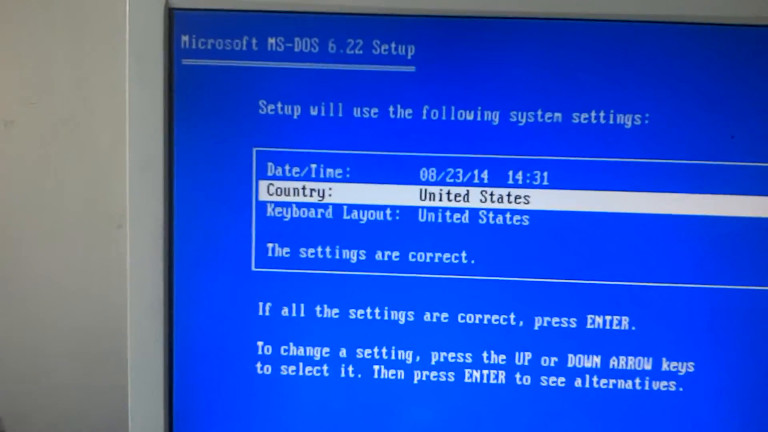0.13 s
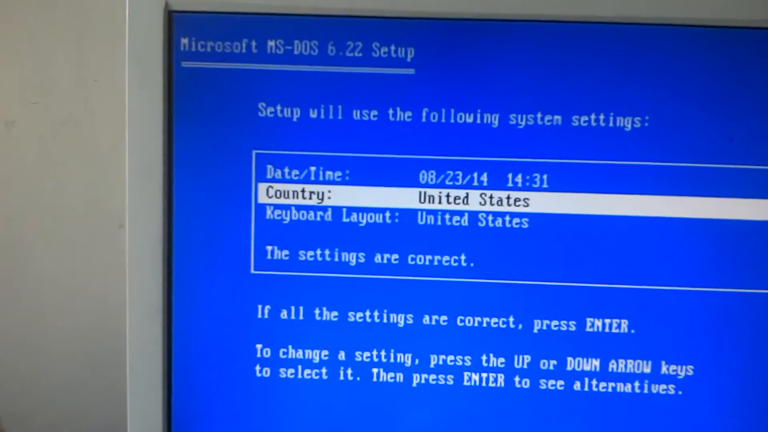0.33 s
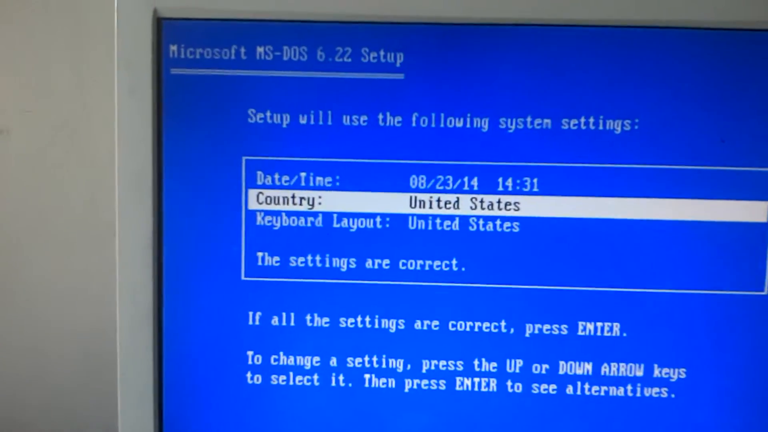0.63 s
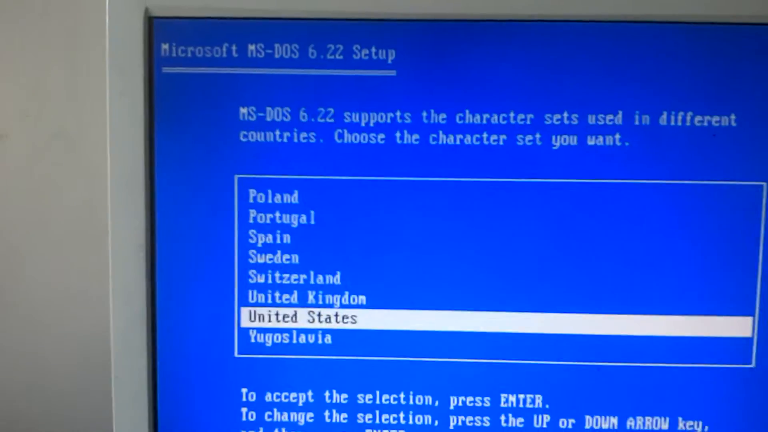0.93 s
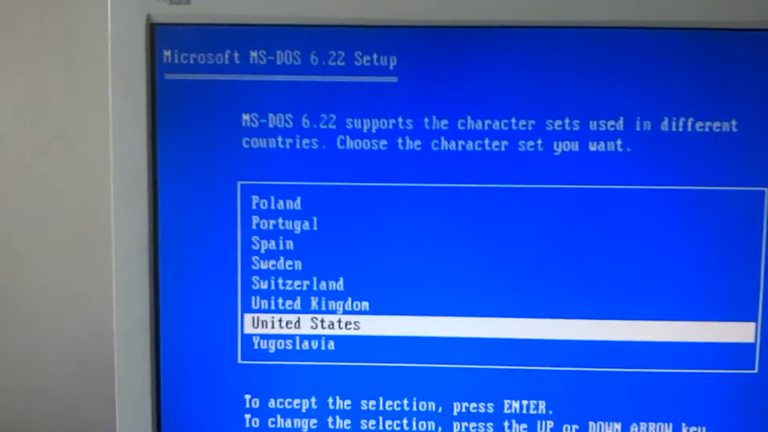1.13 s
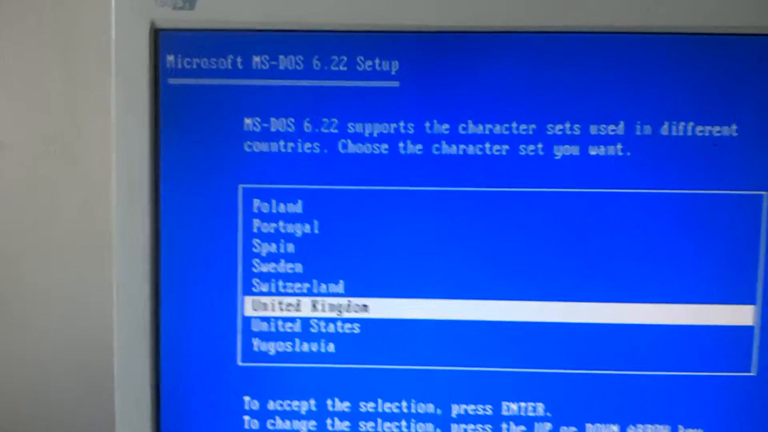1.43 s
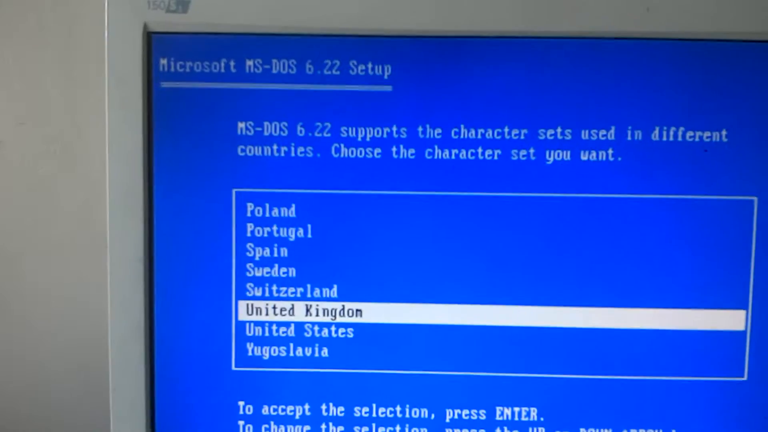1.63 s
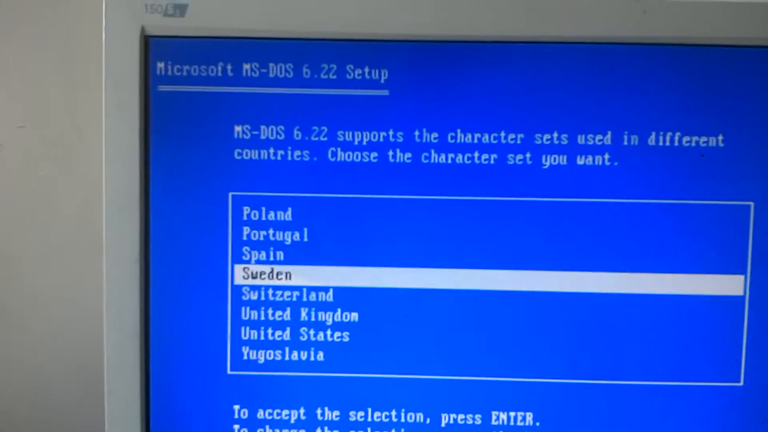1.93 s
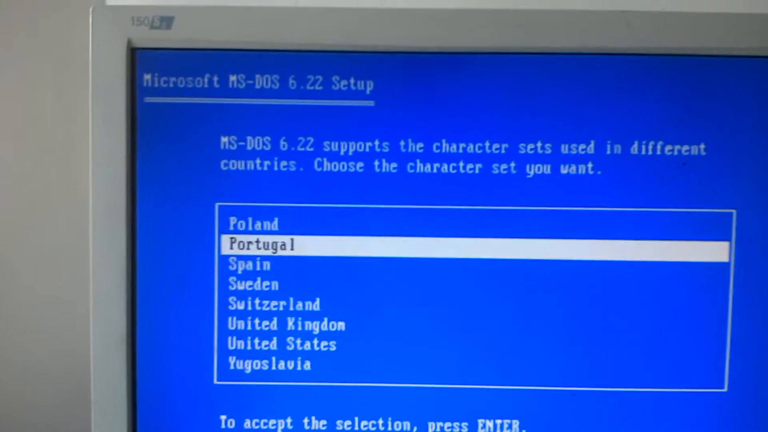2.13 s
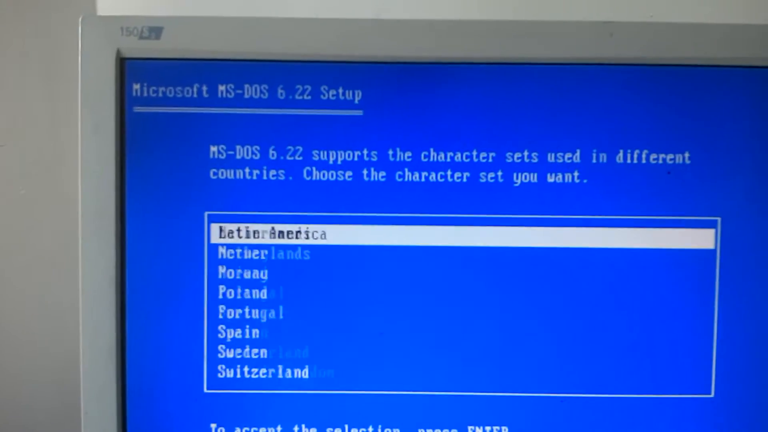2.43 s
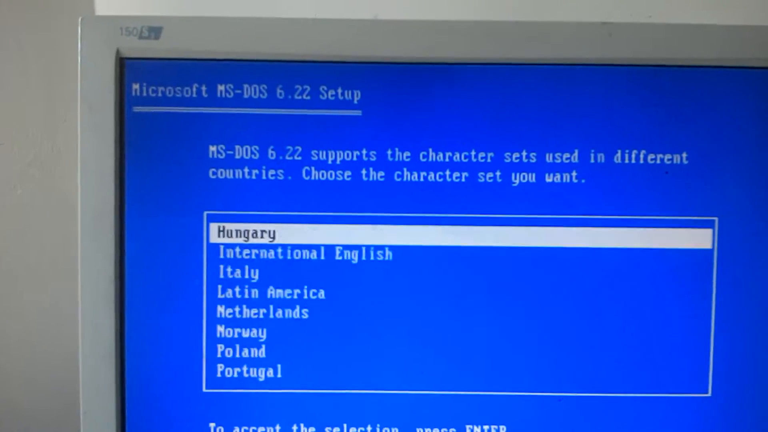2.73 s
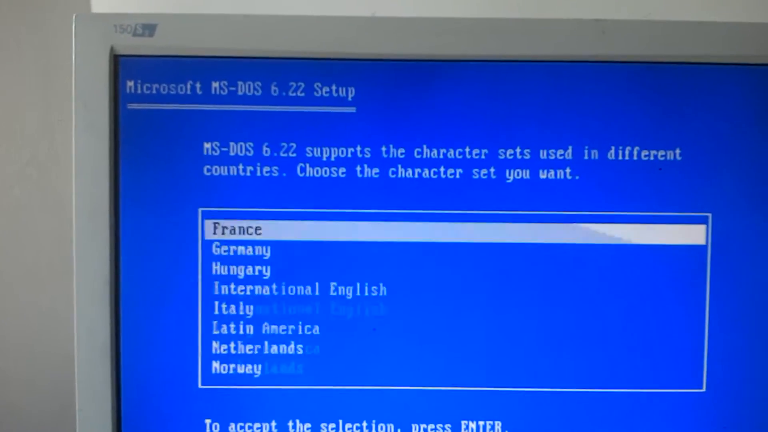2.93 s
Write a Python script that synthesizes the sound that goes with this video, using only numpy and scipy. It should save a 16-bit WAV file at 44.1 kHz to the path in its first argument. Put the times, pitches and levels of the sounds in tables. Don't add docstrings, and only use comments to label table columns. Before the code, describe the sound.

Keyboard clicks close to a mono microphone in a quiet, dry room. A wide plastic key clacks at 0.01 s, with sharp clicks near 0.28, 0.5 and 0.61. The loudest crack, at 0.77, briefly ducks the background; rattles follow until 1.04. A low desk thump comes at 1.39, then faint taps at 2.04 and 2.5. Soft fan hum and thin, wavering spindle whines continue throughout.

```python
import sys
import numpy as np
from scipy import signal
from scipy.fft import rfft, irfft
from scipy.io import wavfile
from scipy.ndimage import uniform_filter1d

SR = 44100
rng = np.random.default_rng(int(sys.argv[2]) if len(sys.argv) > 2 else 0)


def unload_wav(signal):
    wavfile.write(
        sys.argv[1],
        SR,
        np.round(np.clip(np.atleast_2d(signal).T, -1, 1) * 32767).astype(np.int16),
    )


def linear_from_db(decibels):
    return 10 ** (np.asarray(decibels, float) / 20)


N = 135387
HIT = 8192


def curve(rows, x, log=False):
    places, values = np.array(rows, float).T[:2]
    if log:
        return np.interp(np.log(x), np.log(places), values)
    return np.interp(x, places, values)


def unit(x):
    return x / np.sqrt(np.mean(x ** 2))


def peak(x):
    return x / np.abs(x).max()


def walk(rate):
    hold = int(SR / rate)
    steps = np.repeat(rng.standard_normal(N // hold + 1), hold)
    return unit(uniform_filter1d(uniform_filter1d(steps, hold), hold)[:N])


def shaped(gain):
    return unit(irfft(rfft(rng.standard_normal(N)) * gain, N))


def highpass(x, hz):
    return signal.sosfilt(signal.butter(3, hz, "high", fs=SR, output="sos"), x)


def ring(x, hz, t60):
    radius = np.exp(-np.log(1000) / (max(t60, 1 / 500) * SR))
    angle = 2 * np.pi * hz / SR
    return signal.lfilter([0, radius * np.sin(angle)], [1, -2 * radius * np.cos(angle), radius ** 2], x)


def modes(hit, rows):
    return sum(linear_from_db(db) * ring(hit, hz, t60) for hz, db, t60 in rows)


def burst(length, size):
    return rng.standard_normal(size) * np.exp(-np.arange(size) / SR / max(length, 1 / 5000))


def contact(length, db, size):
    hit = burst(length, size)
    hit[0] = max(db + 30, 0) * .09 * np.sqrt(length * SR / 2)
    spectrum = rfft(hit, 2 * size)
    even_hz = 700
    power = uniform_filter1d(np.abs(spectrum) ** 2, int(even_hz * 2 * size / SR))
    return irfft(spectrum / np.sqrt(power))[:size]


def place(out, start, sound):
    out[int(start * SR):][:len(sound)] += sound


def fan():
    # frequency in Hz, density in dB.
    air_colour = [(20, -18), (55, -8), (357, -8), (660, -14), (1800, -8), (2700, -21.5), (4000, -18),
                  (15000, -42)]
    # frequency in Hz, width in Hz, level in dB.
    case_modes = [(57.6, 9.2, -88), (167, 68, -68.5), (235.9, 2.8, -67), (782.6, 60, -61), (6700, 400, -86),
                  (9800, 300, -117), (10500, 340, -81), (13000, 300, -79)]
    air_db, flicker_db, flicker_rate, top_hz = -49.5, 0.5, 14.0, 15450
    hz = np.maximum(np.fft.rfftfreq(N, 1 / SR), 1)
    colour = linear_from_db(curve(air_colour, hz, True)) * (hz < top_hz)
    air = 0
    for octave in range(4, 15):
        band = np.clip(1 - np.abs(np.log2(hz) - octave), 0, 1) ** .5
        noise = irfft(rfft(rng.standard_normal(N)) * colour * band, N)
        air = air + noise * linear_from_db(flicker_db * walk(flicker_rate))
    case = 0
    for centre, width, db in case_modes:
        case = case + linear_from_db(db) * shaped(1 / (1 + ((hz - centre) / width * 2) ** 2))
    return linear_from_db(air_db) * unit(air) + case


def tone(hz):
    return np.sqrt(2) * np.sin(2 * np.pi * (hz * np.arange(N) / SR + rng.random()))


def sidebands():
    # frequency in Hz, level in dB.
    line_colour = [(300, -79.5), (900, -79), (1700, -81), (2700, -77.5), (3600, -72.5), (5000, -79.5),
                   (7000, -86), (14000, -104)]
    shaft_hz, cage_hz, scatter_db = 60.03, 23.55, 3
    ball, cage, shaft = np.mgrid[1:56, -2:3, -1:1].reshape(3, -1)
    families = [ball * ball_hz + cage * cage_hz + shaft * shaft_hz for ball_hz in (253.9, 255.6)]
    hz = np.concatenate(families + [np.arange(3, 100) * shaft_hz])
    chance = rng.standard_normal((len(hz), 2))
    level = linear_from_db(curve(line_colour, hz, True) + scatter_db * chance[:, 0])
    size = 2 ** 19
    lines = np.zeros(size // 2 + 1, complex)
    lines[np.round(hz * size / SR).astype(int)] = level * np.exp(100j * chance[:, 1])
    return irfft(lines, size)[:N] * size / np.sqrt(2)


def spindle():
    # frequency in Hz, rms
    # level in dB.
    steady_tones = [(230.5, -60.0), (240.0, -60.7), (360.0, -59.1), (761.5, -60.1), (780.5, -63.6), (961.5, -62.7),
                    (1080.5, -65.2), (1128.5, -58.5), (1152.0, -67.0), (1260.5, -64.1), (1278.5, -62.9),
                    (1292.0, -67.0), (1320.5, -63.6), (1380.5, -63.6), (1440.5, -52.4), (1558.0, -67.6),
                    (1595.0, -65.7), (1631.0, -66.9), (1656.5, -66.6), (1694.0, -57.1), (1839.5, -67.0),
                    (1949.0, -66.4), (2101.0, -63.2), (2161.0, -65.4), (2315.0, -62.3), (2401.0, -66.6),
                    (2425.0, -70.3), (2538.5, -72.2), (2678.0, -71.3), (2701.5, -64.9), (3057.5, -67.1),
                    (3189.0, -64.7), (3236.5, -63.7), (3371.5, -64.6), (3492.0, -67.2), (3667.5, -64.2),
                    (3727.5, -68.9), (3882.5, -65.5), (3904.5, -66.0), (3923.5, -65.4), (3928.0, -64.7),
                    (4003.0, -64.5), (4085.5, -65.5), (4258.0, -59.6), (4435.0, -69.2), (4569.5, -71.7),
                    (4649.5, -72.3), (4673.0, -74.1), (4690.5, -67.9), (4800.0, -70.1), (4941.5, -70.1),
                    (5354.0, -73.0), (5481.5, -73.7), (5608.5, -75.6), (5737.0, -76.6), (6870.0, -77.7),
                    (6943.5, -77.9), (7016.5, -76.8),
                    (6069.5, -79), (6188.9, -77), (6243.1, -76), (6309.0, -77), (6315.9, -77), (6375.8, -78),
               (7650.6, -81), (8008.0, -83), (8537.9, -83), (9139.6, -84), (9245.3, -84), (10527.2, -85),
               (10684.0, -85), (11829.0, -87), (12694.0, -91), (12947.3, -92)]
    # frequency in Hz, loudest rms level in dB, loudest moment in seconds,
    # fade cycle in seconds, echo share from 0 to 1.
    whine = [(164.5, -56.2, 1.1, 2.8, 0.35), (986.5, -57.7, 2.4, 2.8, 0.65),
             (1269.5, -53.4, 2.3, 5.0, 0.35), (1500.0, -61.4, 4.1, 6.8, 0.5),
             (1523.0, -65.0, 0.8, 4.0, 0.95), (1547.0, -61.5, 3.8, 5.0, 0.65),
             (1753.5, -53.6, 4.2, 6.8, 0.8), (1801.0, -59.5, 2.3, 3.4, 0.65),
             (1927.5, -62.6, 1.4, 2.0, 0.65), (2007.5, -65.8, 1.3, 1.6, 0.5),
             (2054.5, -64.7, 5.4, 6.8, 0.8), (2261.5, -58.0, 0.1, 2.2, 0.35),
             (2308.5, -65.1, 2.1, 2.4, 0.5), (2388.0, -67.7, 2.4, 3.6, 0.65),
             (2515.5, -68.5, 2.4, 3.8, 0.65), (2562.5, -61.5, 0.2, 2.4, 0.8),
             (2816.0, -62.2, 1.6, 2.8, 0.95), (3023.0, -62.3, 6.0, 6.8, 0.65),
             (3046.0, -66.0, 1.0, 1.2, 0.5), (3070.0, -54.9, 4.9, 6.2, 0.5), (3277.0, -52.4, 2.0, 2.2, 0.5),
             (3300.5, -57.8, 6.4, 6.8, 0.95), (3324.0, -53.3, 0.1, 2.0, 0.8),
             (3530.0, -64.6, 1.2, 2.0, 0.35), (3577.5, -59.9, 1.5, 1.8, 0.5),
             (3784.0, -61.6, 0.1, 1.4, 0.5), (3832.0, -60.0, 2.3, 2.4, 0.65),
             (4038.5, -59.3, 0.0, 1.2, 0.5), (4292.5, -55.9, 6.0, 6.8, 0.5), (4339.5, -62.3, 0.8, 1.6, 0.2),
             (4467.0, -65.6, 0.0, 2.2, 0.65), (4514.0, -61.1, 3.5, 6.2, 0.35),
             (4593.0, -69.6, 1.2, 1.6, 0.8), (4686.0, -66.4, 2.4, 3.2, 0.35),
             (4810.5, -65.6, 3.3, 6.6, 0.95), (5054.0, -68.8, 0.0, 1.4, 0.65),
             (5197.5, -65.7, 0.3, 1.2, 0.5), (5838.5, -71.0, 2.1, 3.2, 0.5), (6827.0, -70.8, 2.8, 3.4, 0.8),
             (6854.5, -73.9, 2.9, 4.2, 0.8)]
    tones_db, wobble_db, wobble_rate = -0.05, 1.1, 2.78
    t = np.arange(N) / SR
    out = 0
    wobbles = [linear_from_db(wobble_db * walk(wobble_rate)) for _ in range(8)]
    for k, (hz, db) in enumerate(np.array(steady_tones)):
        out = out + linear_from_db(db + tones_db) * wobbles[k % 8] * tone(hz)
    for hz, db, loudest, cycle, echo in whine:
        fade = np.abs(1 + echo * np.exp(2j * np.pi * (t - loudest) / cycle)) / (1 + echo)
        out = out + linear_from_db(db + tones_db) * fade * tone(hz)
    return out + sidebands()


def desk_thumps():
    # start in seconds, level in dB, rumble length in seconds.
    thumps = [
        (.79, -38, 0.037),
        (1.041, -35, 0.011),
        (1.387, -28, .02),
        (1.401, -29.5, 0.044),
        (1.42, -36, 0.03),
        (1.433, -39, 0.013),
        (2.5, -38, 0.074),
    ]
    # frequency in Hz, level in dB, t60 in seconds.
    desk = [(169, -2.5, 0.13), (206.3, 0.5, 0.091), (226.6, 1, 0.14), (334, -12, 0.055)]
    out = np.zeros(N + SR)
    for start, db, length in thumps:
        hit = burst(length, HIT)
        hit[0] -= 30
        place(out, start, linear_from_db(db) * peak(highpass(modes(hit, desk), 149)))
    return out


def tray_knocks():
    # start in seconds, level in dB, frequency in Hz, t60 in seconds.
    knocks = [(.7745, -32, 2020, 0.0079), (1.012, -36, 1500, .01), (1.012, -36.5, 510, .02),
              (.0152, -20, 1830, 0.037), (0.041, -29.5, 870, 0.083), (0.281, -31, 1500, 0.021),
              (0.282, -41, 540, 0.021), (0.364, -36, 756, 0.019), (0.777, -31, 1210, 0.019),
              (.778, -37.5, 590, 0.15), (.781, -38, 414, 0.14), (.8765, -28, 740, 0.013),
              (.879, -30.5, 600, 0.013), (1.033, -25, 1600, 0.0064), (1.04, -22, 460, 0.0098),
              (1.386, -35.5, 470, 0.037), (2.038, -40.5, 585, 0.076), (2.497, -34, 1750, 0.039),
              (2.496, -36.5, 440, 0.02)]
    contact_s, pair_ratio, pair_db = .0025, 1.06, -4
    out = np.zeros(N + SR)
    for start, db, hz, t60 in knocks:
        hit = contact(contact_s, db, HIT)
        pair = ring(hit, hz, t60) + linear_from_db(pair_db) * ring(hit, hz * pair_ratio, t60)
        place(out, start, linear_from_db(db) * peak(pair))
    return out


def wide_key():
    # frequency in Hz, level in dB, t60 in seconds.
    bar = [(446, -10.5, 0.093), (615, -8, .04), (880, -5, 0.081), (1154, -5.5, 0.072), (1500, -22, 0.019),
           (1790, 5, 0.054), (2430, -7, 0.035), (2830, -8, 0.037), (3550, -6, 0.035), (3900, -13, 0.018),
           (7100, -9, 0.023), (7530, -10, 0.029), (8010, -13, 0.031), (9318, -11.5, 0.038)]
    start_s, level_db, rattle_s = .0142, -15, .005
    out = np.zeros(N + SR)
    place(out, start_s, linear_from_db(level_db) * peak(modes(contact(rattle_s, level_db, HIT), bar)))
    return out


def key_clicks():
    # start in seconds, level in dB, rattle length in seconds,
    # main ring in Hz, treble tilt in dB per octave.
    clicks = [(.0142, -22, 0.0027, 8250, 5), (.275, -20, 0.00096, 3630, 1),
              (.2772, -10.5, 0.00052, 3550, 2), (.2839, -20, 0.00045, 3540, -3),
              (.2896, -25.5, 0.00073, 3600, 2.5), (.362, -27.5, 0.0046, 2670, -1),
              (.4992, -17, 0.0013, 3600, 0), (0.5019, -27.5, 0.0016, 4800, 0),
              (.6138, -23, 0.001, 3500, 0.5), (.6146, -28.5, .001, 2070, 0.5),
              (0.7743, -5.5, 0.00044, 4180, -2), (.776, -16, 0.00081, 3300, 1),
              (0.7771, -24, 0.0035, 3500, 4), (.859, -27.5, 0.0018, 2070, -10),
              (.883, -22, 0.0026, 4800, -1), (1.0112, -22.5, 0.0045, 3100, 0),
              (1.0135, -22, 0.0026, 3500, -6), (1.0305, -24, 0.0061, 3280, -5),
              (1.0372, -21, 0.0043, 2980, 1.5), (1.345, -31.5, .002, 2930, -1),
              (1.384, -32, 0.0014, 1220, -3), (2.037, -37, .002, 7500, -5), (2.495, -29, .003, 4460, -9)]
    # frequency in Hz, level in dB.
    cap_modes = [(1220, -8.5), (1900, 0), (2400, -3.5), (2900, -15.5), (3600, 3), (4200, 2.5), (4800, 0),
                 (5500, -23), (6400, -14), (7300, -10.5), (8300, -8), (9600, -14.5), (10800, -16),
                 (13500, -32)]
    cap_t60, ring_t60, scatter_db = .005, .008, 1.5
    ring_db, crack_db, treble_hz = 1, -30, 5000
    out = np.zeros(N + SR)
    for start, db, length, main_hz, treble_db in clicks:
        hit = contact(length, db, HIT)
        cap = linear_from_db(ring_db) * ring(hit, main_hz, ring_t60)
        for k, (hz, mode_db) in enumerate(cap_modes):
            louder, higher = rng.standard_normal(2)
            tilt = treble_db * (hz > treble_hz) * np.log2(2 * hz / treble_hz)
            mode = ring(hit, hz * (1 + higher / 40), cap_t60)
            cap = cap + (-1) ** k * linear_from_db(mode_db + scatter_db * louder + tilt) * mode
        crack = peak(np.diff(hit, prepend=0))
        place(out, start, linear_from_db(db) * (peak(cap) + linear_from_db(crack_db + 2 * treble_db) * crack))
    return out


def room(x):
    level_db, t60, damping = -21, .25, .6
    tail = signal.lfilter([1], [1, -damping], burst(t60 / np.log(1000), 8192))
    tail = tail / np.sqrt(np.sum(tail ** 2))
    return x + linear_from_db(level_db) * signal.fftconvolve(x, tail)[:len(x)]


def keyboard():
    plastic = highpass(tray_knocks() + wide_key() + key_clicks(), 288)
    return (desk_thumps() + room(plastic))[:N]


def scene():
    return np.tile(fan() + spindle() + keyboard(), (2, 1))


def roll_off(x):
    return signal.sosfilt(signal.butter(12, 16500, fs=SR, output="sos"), x)


def record(dry):
    # time in seconds, gain in dB.
    gain = [(0, 1.5), (.05, -1.5), (.28, -1), (.33, -3.5), (.6, 0), (.775, -1), (.85, -10), (1.05, -8.5),
            (1.4, -4.5), (1.63, -2.5), (1.9, 0), (2.5, -0.5), (3.07, 0)]
    top_hz, offset = 16300, -.0011
    limited = signal.sosfilt(signal.ellip(8, .2, 60, top_hz, fs=SR, output="sos"), dry)
    mix = limited * linear_from_db(curve(gain, np.arange(N) / SR)) + offset
    return roll_off(mix)


dry = scene()
out = record(dry)
unload_wav(out)
```